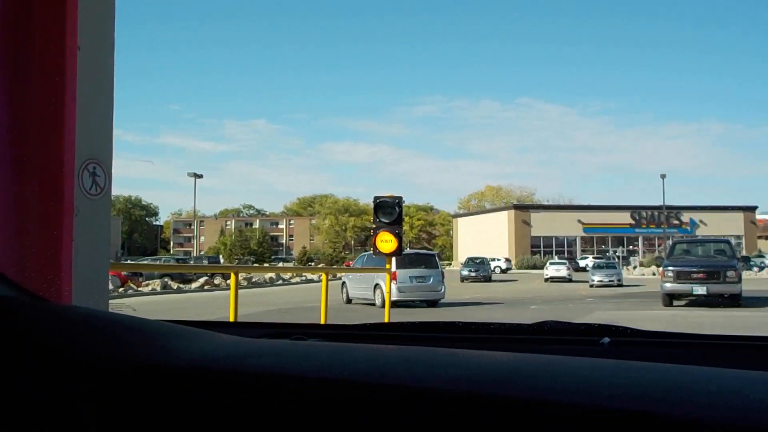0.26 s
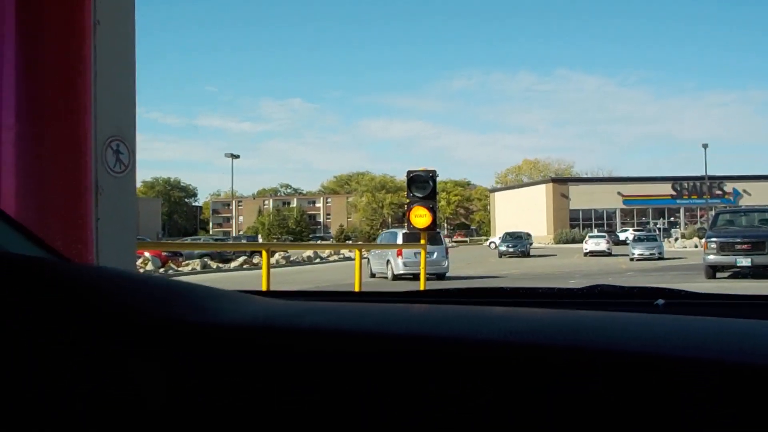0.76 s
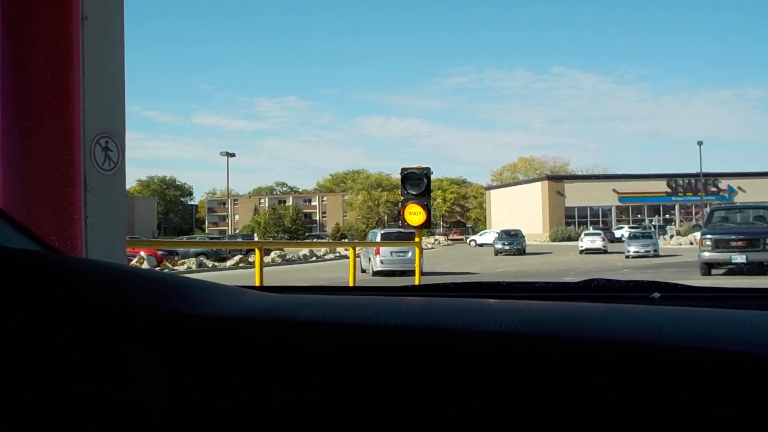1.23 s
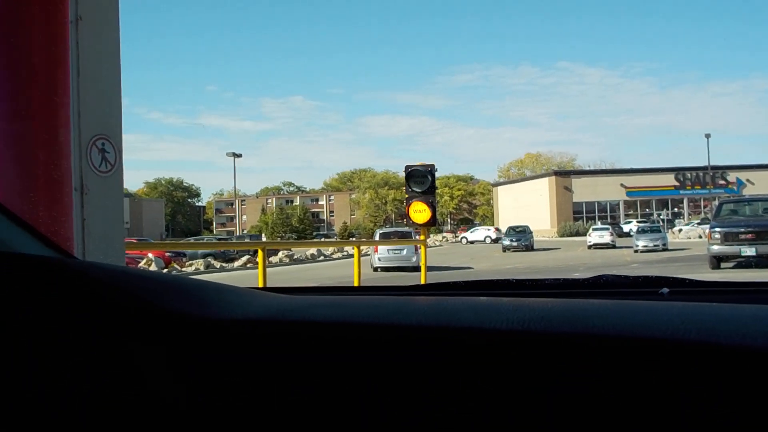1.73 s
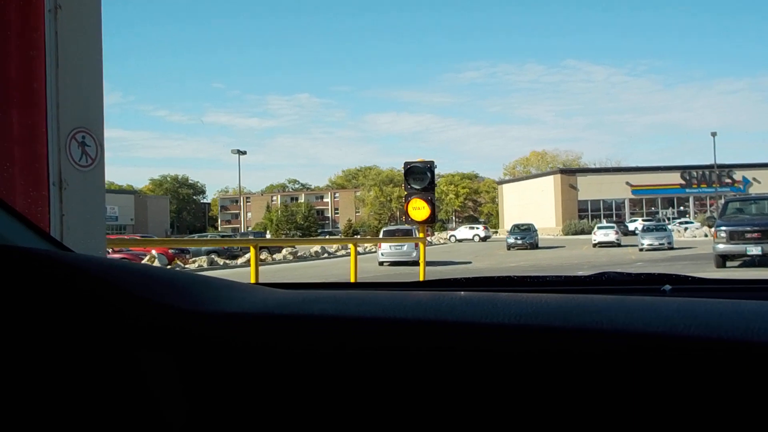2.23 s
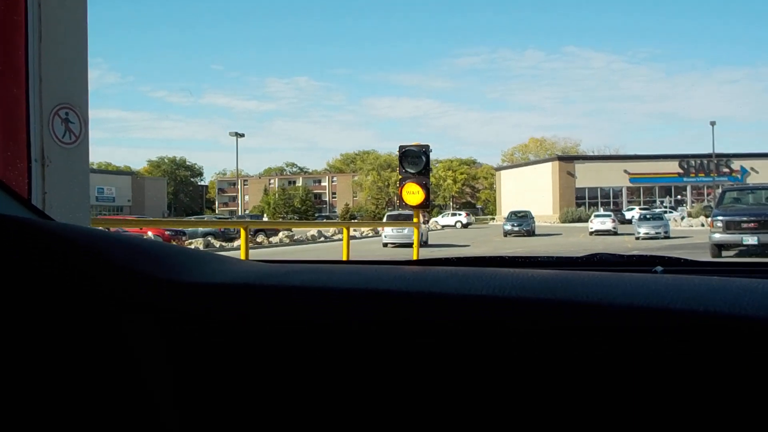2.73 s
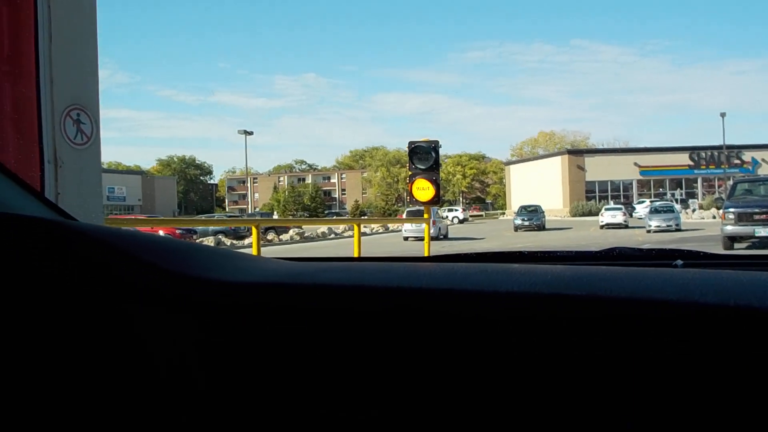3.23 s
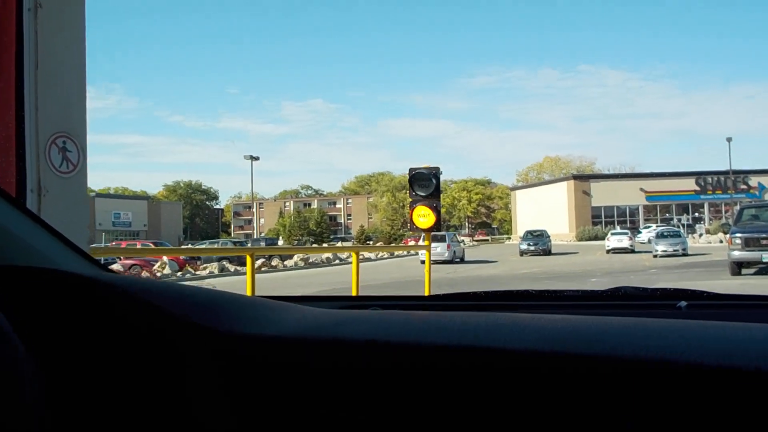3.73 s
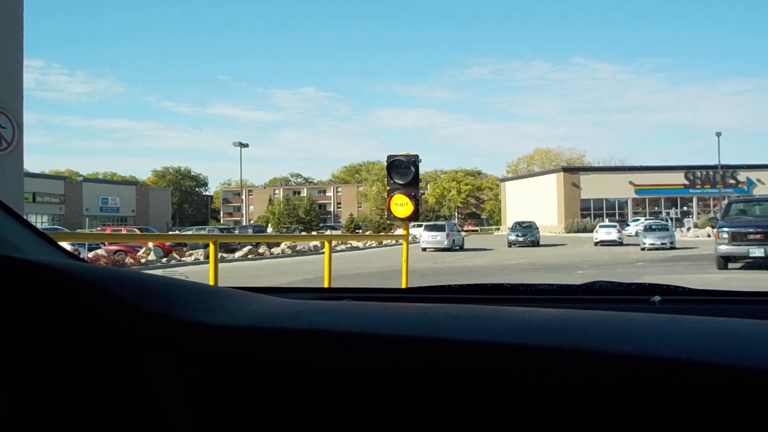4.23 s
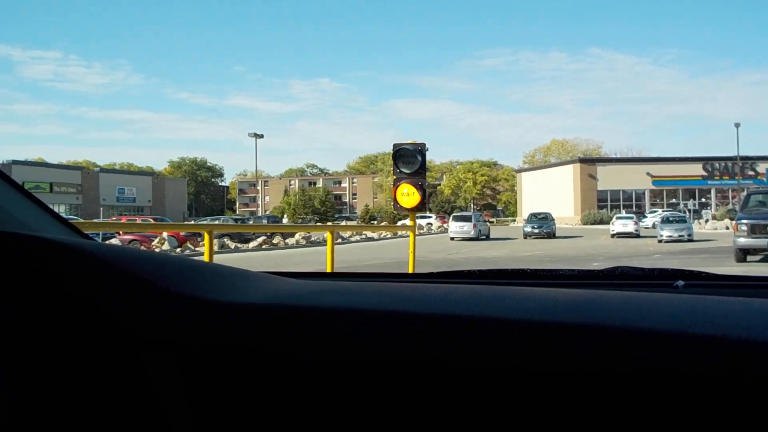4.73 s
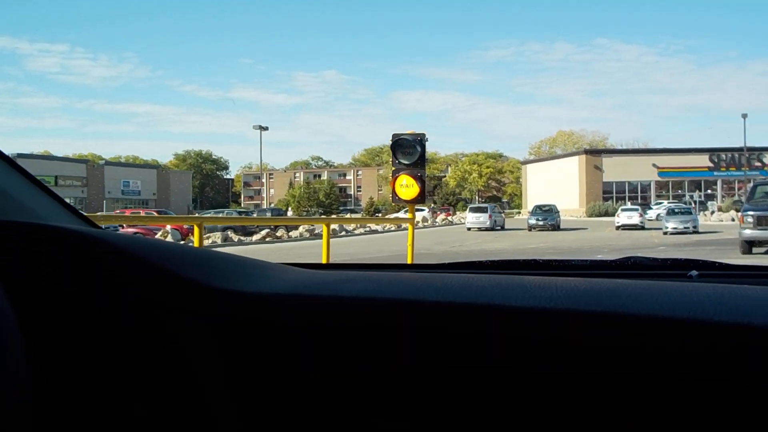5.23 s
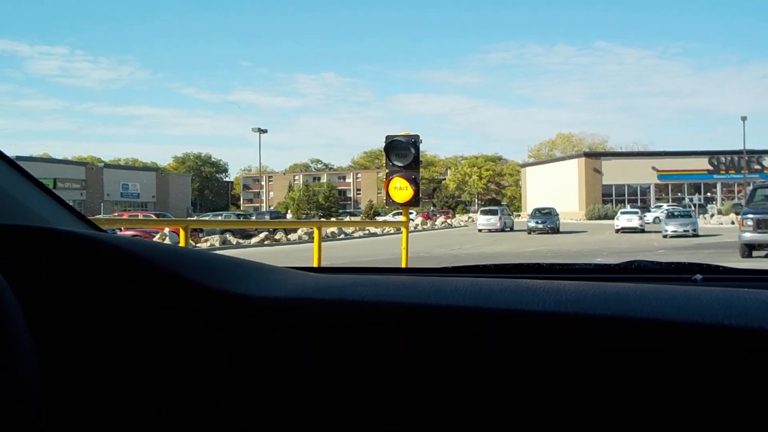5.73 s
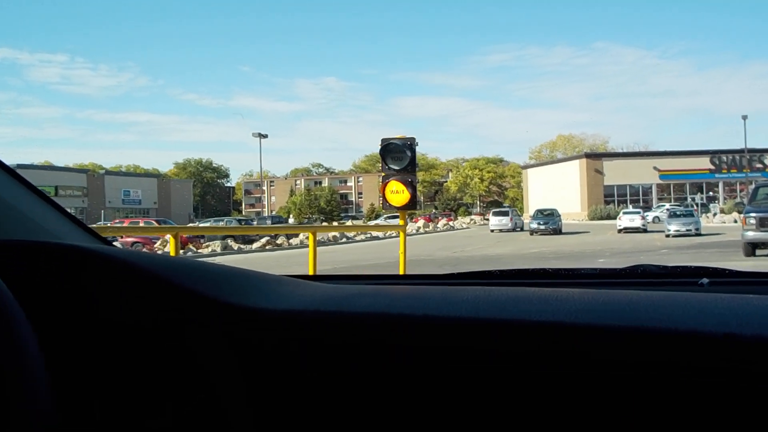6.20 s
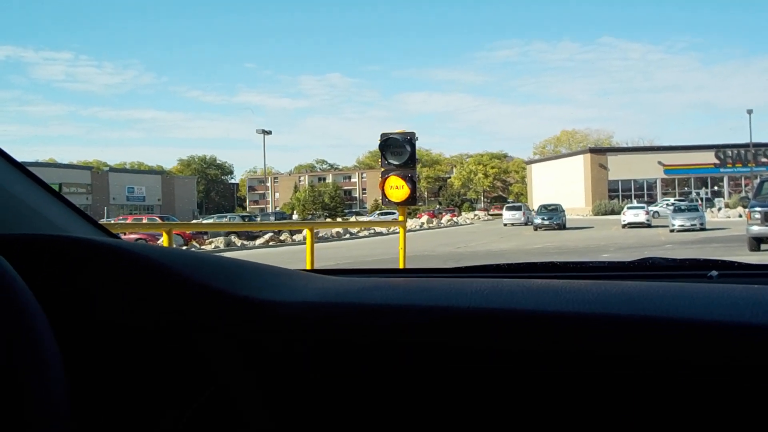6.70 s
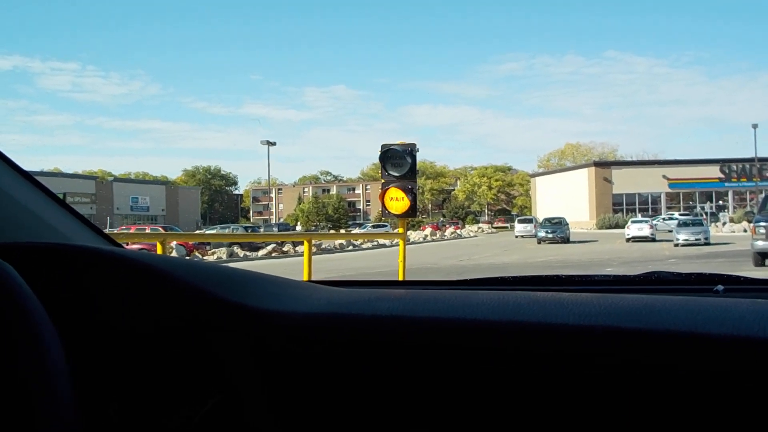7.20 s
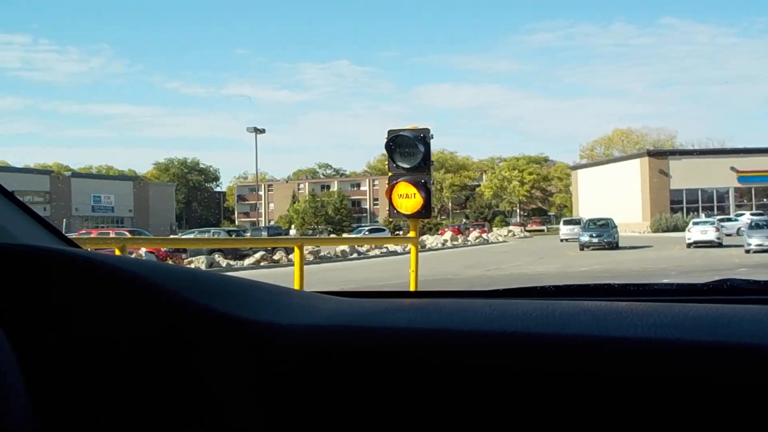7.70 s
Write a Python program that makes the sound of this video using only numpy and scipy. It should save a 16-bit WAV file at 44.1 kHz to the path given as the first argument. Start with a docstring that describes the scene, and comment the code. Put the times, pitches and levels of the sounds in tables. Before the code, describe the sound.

Heard in stereo from inside a car with its windows shut, rolling out of an automatic car wash. From 0 s, powerful dryer jets drum on the roof as thick, gusty, muffled noise, with a deep cabin boom and a rushing hiss above. Sharp plastic ticks cluster close to the microphone at 0.3-0.5 s, with another near 0.9 s; the strongest briefly duck the background. Around 2 s the drumming moves from roof to rear glass, the boom weakens, and gusts and quick air slaps continue, notably near 3 s. Between 3.5 and 4.3 s the jets slide off the tail, leaving a steadier tunnel roar, blower rush, seal hiss and a faint wavering whine. More dry ticks come at 5.5-5.65 s as the roar slowly fades. At 7.45 s a tiny scrape leads into a hard, hollow knock, followed by a last mild gust near 7.8 s.

```python
"""Car wash dryers, heard from inside a car rolling out of the tunnel with its windows shut.
The air jets drum on roof and glass as noise through panel resonances, and the cabin booms beneath.
Then they slide off the tail, leaving a fading tunnel roar, the blowers' rush and hiss, and a faint sine whine.
Sharp plastic ticks and one knock, made of short noise bursts and ringing sines, sound close to the microphone.
Its gain control ducks on strong bursts of treble."""
import sys
import numpy as np
from scipy import signal
from scipy.fft import rfft, irfft, next_fast_len
from scipy.io import wavfile
from scipy.ndimage import uniform_filter1d, minimum_filter1d, map_coordinates

SR = 44100
rng = np.random.default_rng(int(sys.argv[2]) if len(sys.argv) > 2 else 0)


def generate_wav(signal):
    """Clip the signal to [-1, 1] and save it as 16-bit WAV at the path in sys.argv[1]."""
    frames = np.transpose(np.atleast_2d(signal))
    scaled = np.clip(frames, -1, 1) * 32767
    pcm = np.round(scaled).astype(np.int16)
    wavfile.write(sys.argv[1], SR, pcm)


N = 350595

# the car's passage under the jets: (time [s], how squarely they hit [0-1], drumming level before gusts [dB])
JET_PASSAGE = [(0, 0.95, -26.5), (1.8, 0.91, -25.5), (2.15, 0.76, -27), (2.62, 0.95, -27.5),
               (2.85, 0.98, -28.3), (3.5, 0.76, -26.5), (3.88, 0.47, -29.5), (4.3, 0.03, -28),
               (7.95, 0, -18)]


def amp(db):
    """Decibels to gain."""
    return 10 ** (np.asarray(db) / 20)


def unit(x):
    """x at rms 1."""
    return x / np.sqrt(np.mean(x ** 2) + 1e-20)


def along(points, hz):
    """(frequency, value) points read on a log-frequency axis."""
    f, v = np.transpose(points)
    return np.interp(np.log(hz + 1), np.log(f + 1), v)


def curves(rows):
    """One value per sample for each column after the time."""
    times, *columns = np.transpose(rows)
    return [np.interp(np.arange(N) / SR, times, column) for column in columns]


def wobble(rate):
    """A smooth random curve with rate knots a second."""
    knots = rng.standard_normal(int(N * rate / SR) + 4)
    return map_coordinates(knots, [np.arange(N) * rate / SR])


def swells(rows, t):
    """Bell-shaped rises in dB from (time, rise, standard deviation) rows."""
    return sum(db * np.exp(-.5 * ((t - s) / length) ** 2) for s, db, length in rows)


def filtered(x, response):
    """x times a response of frequency."""
    n = x.shape[-1]
    padded = next_fast_len(n + n // 16)
    hz = np.fft.rfftfreq(padded, 1 / SR)
    return irfft(rfft(x, padded) * response(hz), padded)[..., :n]


def split(x, corner_hz):
    """The bass and the treble of x, which sum back to x."""
    bass = filtered(x, lambda hz: 1 / (1 + (hz / corner_hz) ** 6))
    return bass, x - bass


def band(low_hz, high_hz):
    """Gain per frequency of a steep band-pass."""
    return lambda hz: 1 / (1 + (low_hz / (hz + 1)) ** 8 + (hz / high_hz) ** 12)


def ports(left_db):
    """Gains of the left and right microphone ports, left_db apart, with a mean of 1."""
    pair = amp([[left_db / 2], [-left_db / 2]])
    return pair / pair.mean()


def airflow(spectrum, resonances, patchy_db):
    """Turbulent stereo noise of rms 1: patchy in time and pitch, coloured by a spectrum and its resonances."""
    # how alike the two channels are: (frequency [Hz], likeness [0-1])
    likeness = [(100, 0.94), (1600, 1), (2500, 0.9), (3300, 0.76), (5000, 0.69), (6200, 0.52), (7200, 0.13),
                (12000, 1)]
    grains = signal.stft(rng.standard_normal((2, N)), nperseg=512)[2]
    eddies = uniform_filter1d(rng.standard_normal(grains.shape[1:]), size=5, axis=0)
    eddies = uniform_filter1d(eddies, size=10, axis=1)
    pair = signal.istft(grains * amp(patchy_db * unit(eddies)), nperseg=512)[1][:, :N]

    def colour(hz):
        # each lift falls to half its dB at half a width from the centre
        lift = sum(db * .5 ** ((2 * (hz - centre) / width) ** 2) for centre, width, db in resonances)
        turn = np.arccos(np.clip(along(likeness, hz), 0, 1)) / 2
        return amp(along(spectrum, hz) + lift) * [np.cos(turn), np.sin(turn)]
    mid, side = filtered(pair, colour)
    return unit(np.array([mid + side, mid - side]))


def rolling_out(under_jet, behind):
    """Equal-power crossfade from one sound to the other as the car leaves the jets."""
    share = np.clip(curves(JET_PASSAGE)[0], 0, 1)
    return np.sqrt(share) * under_jet + np.sqrt(1 - share) * behind


def drumming():
    """The jets travel along the car, so the roof's resonances give way to those of the rear glass."""
    # spectrum of the drumming: (frequency [Hz], relative density [dB per Hz])
    spectrum = [(130, -46), (200, -19), (232, -12), (268, -6), (480, 1.5), (700, -0.5), (900, -7.5),
                (2000, -37), (2500, -83)]
    # panel resonances: (centre [Hz], width [Hz], lift [dB])
    roof = [(272, 36, 3), (352, 26, -4), (380, 22, 1), (438, 42, 6), (511, 34, 5.3), (548, 40, -7),
            (592, 24, 3), (660, 56, 3.8), (775, 50, -3)]
    rear_glass = [(280, 36, 2.5), (348, 26, -5.5), (380, 22, 2), (434, 42, 3.8), (510, 40, 3.5),
                  (548, 40, -6), (592, 24, 3), (665, 50, 3.8), (840, 36, 2), (910, 36, 2.5)]
    rear_s, crossing_s = 2.05, 0.73  # midpoint and length of the crossing
    rear = np.clip(.5 + (np.arange(N) / SR - rear_s) / crossing_s, 0, 1)
    on_roof = np.sqrt(1 - rear) * airflow(spectrum, roof, patchy_db=-0.63)
    on_glass = np.sqrt(rear) * airflow(spectrum, rear_glass, patchy_db=1.4)
    return on_roof + on_glass


def flexing(x, bend=0.008005, rate=5):
    """The panels flex under the jets, so their resonances drift a little up and down."""
    place = np.arange(N) + np.cumsum(bend * wobble(rate))
    return np.array([map_coordinates(side, [place], mode="mirror") for side in x])


def battered_panels(t, flutter_db=0.22, flutter_rate=28):
    """Drumming on flexing panels, with slaps of air that lift only the upper part of its sound."""
    # slaps of air on the roof: (time [s], rise [dB], standard deviation [s])
    slaps = [(.647, 6, .004), (.765, 2, .015), (1.334, 5, .018), (2.991, 7, .005), (3.046, 4, .005),
             (3.972, 6, .004)]
    level_db = curves(JET_PASSAGE)[1] + flutter_db * wobble(flutter_rate)
    low, clatter = split(flexing(drumming()), corner_hz=300)
    return amp(level_db) * (low + amp(swells(slaps, t)) * clatter)


def tunnel(t, level_db=-33, fade_from_s=5.75, fade_db_per_s=0.8):
    """The tunnel's roar heard through the cabin's resonances, fading with distance."""
    # spectrum of the roar: (frequency [Hz], relative density [dB per Hz])
    spectrum = [(25, -48), (50, -32.5), (95, -39), (122, -15.5), (165, -20), (200, -26.5), (232, -19),
                (268, -6), (350, -0.5), (520, -1), (700, -2.5), (900, -7.5), (2000, -22.5), (2500, -87)]
    # cabin resonances: (centre [Hz], width [Hz], lift [dB])
    resonances = [(335, 30, 2), (445, 46, 4.6), (449, 14, 5), (550, 50, -4), (590, 28, 2), (690, 30, 2)]
    faded_db = level_db - fade_db_per_s * np.maximum(t - fade_from_s, 0)
    return amp(faded_db) * airflow(spectrum, resonances, patchy_db=0.27)


def roar():
    """Gusty jets batter the panels; once past them, only the tunnel's roar reaches the cabin."""
    # gusts, each a smooth swell of the roar: (time [s], rise [dB], standard deviation [s])
    gusts = [(.54, 2, 0.032), (.74, 1.5, 0.034), (.98, 2, 0.1), (1.35, 2.5, 0.048), (1.58, 2.3, .06),
             (1.88, 3.5, 0.079), (2.45, 3, 0.029), (3.02, 1, 0.029), (3.17, 0, 0.021), (3.33, 1.5, 0.035),
             (4.53, 2, 0.033), (7.78, 2.5, .07)]
    t = np.arange(N) / SR
    return amp(swells(gusts, t)) * rolling_out(battered_panels(t), tunnel(t))


def boom():
    """The jets pump the air in the cabin, which booms at two low resonances and dies away behind them."""
    # (time [s], level [dB])
    level = [(0, -42.5), (1, -42), (1.55, -43), (2.2, -42), (2.6, -49), (3.15, -48), (3.55, -47),
             (3.95, -52), (4.6, -64), (7.95, -88)]
    # (frequency [Hz], relative density [dB per Hz])
    spectrum = [(25, -56), (50, -27), (95, -36), (116, -9), (145, -3), (180, -4.5), (205, -11.5),
                (260, -60.5)]
    # resonances of the cabin air: (centre [Hz], width [Hz], lift [dB])
    cabin_air = [(126, 14.5, 8.5), (166.4, 39, 6.5)]
    return amp(curves(level)[0]) * airflow(spectrum, cabin_air, patchy_db=0.8)


def nozzle_rush():
    """Nozzle turbulence of rms 1 through the resonant side glass."""
    # (frequency [Hz], relative density [dB per Hz])
    spectrum = [(300, -31.5), (650, -12.5), (950, 2), (1450, -0.5), (1650, -4), (1950, -8.5), (2150, -14.5),
                (2350, -31.5), (2700, -51), (4000, -91)]
    # (centre [Hz], width [Hz], lift [dB])
    side_glass = [(1200, 50, 3), (1320, 120, -2), (1440, 70, 2.5)]
    return airflow(spectrum, side_glass, patchy_db=0.0)


def seal_hiss():
    """Air hisses through the door seals, whose resonances change as the jets fall behind."""
    # (frequency [Hz], relative density [dB per Hz])
    spectrum = [(1800, -40), (2450, -15.5), (2750, 1.5), (3030, -11), (3400, 0.5), (4100, 0), (4700, -4.5),
                (5400, 6), (6000, 1), (6900, 1.5), (7500, -15), (7900, -71), (9000, -56.5)]
    # seal resonances: (centre [Hz], width [Hz], lift [dB])
    under_jet = [(3690, 150, 3), (4190, 160, 3.4), (5190, 150, 3.7)]
    behind = [(3720, 190, 1.5), (5170, 140, 3.8), (6130, 220, 6.6)]
    return rolling_out(airflow(spectrum, under_jet, patchy_db=0.46), airflow(spectrum, behind, patchy_db=0.34))


def fan_whine(pitch_hz=1945, level_db=-62, waver_hz=2.5):
    """A faint sine that wavers in pitch and strength."""
    phase = 2 * np.pi * np.cumsum(pitch_hz + waver_hz * wobble(5.6)) / SR
    return amp(level_db) * unit(np.sin(phase) * amp(2.5 * wobble(3.8)))


def blowers(hiss_trim_db=0.79):
    """Nozzle rush through the glass, hiss through the door seals, and the fan whine."""
    # (time [s], rush level [dB], hiss level before its trim [dB])
    levels = [(0, -36, -47), (1, -37, -46.5), (2, -36.5, -46.5), (3.7, -36.5, -45.5), (4.4, -38.5, -46),
              (5.9, -37.5, -47), (7.3, -40, -46.5), (7.95, -39, -47)]
    rush_db, hiss_db = curves(levels)
    return amp(rush_db) * nozzle_rush() + amp(hiss_db + hiss_trim_db) * seal_hiss() + fan_whine()


def microphone_hiss(level_db=-69.0, shared=1.0):
    """Faint, even self-noise, partly common to both channels."""
    # (frequency [Hz], relative gain [dB])
    spectrum = [(4000, -22), (8000, -44), (9500, 10), (12500, 16.5), (15000, 13.5), (16000, 12)]
    noise = rng.standard_normal((2, N)) + shared * rng.standard_normal(N)
    return amp(level_db) * unit(filtered(noise, lambda hz: amp(along(spectrum, hz))))


def burst(t, colour, t60=.0025, span_s=.0016):
    """A tiny random crunch around t = 0, its spectrum shaped by the given gain per frequency."""
    fade = (t >= 0) * amp(-60 * np.abs(t) / t60)
    phase = np.angle(rfft(fade * rng.standard_normal(len(t))))
    crunch = irfft(np.exp(1j * phase) * colour(np.fft.rfftfreq(len(t), 1 / SR)))
    crunch = crunch * np.exp(-.5 * (t / span_s) ** 2)
    return unit(crunch) * np.sqrt(np.mean(fade ** 2)) / 2  # the fade sets its energy


def snap(t, apart=.5):
    """A bright, dry crack, partly different at each port."""
    # (frequency [Hz], relative gain [dB])
    spectrum = [(200, -50), (1000, -20), (2500, -3), (6000, 13), (7200, 12), (8100, -12), (9600, 7),
                (12500, 9), (15500, 5), (16200, -9)]
    bright = lambda hz: amp(along(spectrum, hz))
    common = burst(t, bright)
    opposed = apart * burst(t, bright) * [[1], [-1]]
    return (common + opposed) / np.hypot(1, apart)


def tick_ring(t, ring_db, scatter_db=1.8, lead_s=.0008, rise_s=.0017, left_db=-19):
    """The plastic rings at two pitches in a short swell, mostly at the right port."""
    # (frequency [Hz], level relative to the ring [dB])
    modes = [(2130, 0), (2750, -5.5)]
    age = np.maximum(t + lead_s, 0)
    swell = (age / rise_s * np.exp(1 - age / rise_s)) ** 2
    tone = 0
    for k, (hz, level_db) in enumerate(modes):
        gain = amp(ring_db + level_db + scatter_db * rng.standard_normal())
        tone = tone + (-1) ** k * gain * np.sin(2 * np.pi * hz * age)
    return swell * tone * amp([[left_db], [0]])


def ticks():
    """Each tick is a brief dry snap over a narrower body, with a short two-note plastic ring."""
    # (time [s], crack level [dB], body low edge [Hz], body high edge [Hz], body relative to the snap [dB],
    #  crack's left minus right before the ports' tilt [dB], ring level before scatter [dB])
    events = [(.321, -14, 1500, 3600, -5, -24, -23.5), (.3315, -44, 2000, 3000, -6, -10, -25),
              (.3948, -18, 4300, 5500, 3.5, -22, -26), (.405, -52, 2000, 3000, -6, -10, -29),
              (.4148, -18.5, 4400, 5600, 5, -16, -24), (.4265, -54, 2000, 3000, -6, -10, -31.5),
              (.462, -22.5, 3300, 6000, -9, -22, -29), (.8905, -29, 4300, 5500, 7, -18, -30.5),
              (5.4982, -35, 2000, 3000, -8, -11, -31), (5.544, -23.5, 3200, 4500, -7, -24, -30),
              (5.5634, -21.5, 4000, 6200, -4, -22, -29.5), (5.6204, -25.5, 11800, 13200, -6, -22, -29.5),
              (5.6405, -58, 2000, 3000, -6, -10, -36)]
    out, t = np.zeros((2, N)), np.arange(-256, 1280) / SR
    for s, db, low_hz, high_hz, body_db, left_db, ring_db in events:
        body = amp(body_db) * burst(t, band(low_hz, high_hz))
        crack = amp(db) * (snap(t) + body) * ports(left_db)
        start = round((s + t[0]) * SR)
        out[:, start:][:, :len(t)] += crack + tick_ring(t, ring_db)
    return out


def knock(at_s=7.4511, snap_db=-22, scrape_lead_s=.0007):
    """A scrape leads into one hard, duller blow that rings a few short, hollow modes under a thin snap."""
    # scrape: (low edge [Hz], high edge [Hz], level [dB], left minus right before the ports' tilt [dB])
    scrape_settings = (3300, 4500, -20, -8)
    # (frequency [Hz], level before the body's band [dB], t60 [s], left minus right before the ports' tilt [dB])
    modes = [(1150, -12, .0045, -7), (1900, -18, .006, -6), (2850, -28, .012, 4), (3400, -30, .009, 0),
             (4500, -22, .008, 2)]
    # bands of the hollow body and the thin snap: (low edge [Hz], high edge [Hz])
    body_band = (750, 4900)
    snap_band = (8500, 15500)
    out, t = np.zeros((2, N)), np.arange(-256, 1280) / SR
    low_hz, high_hz, scrape_db, left_db = scrape_settings
    scrape = amp(scrape_db) * burst(t + scrape_lead_s, band(low_hz, high_hz)) * ports(left_db)
    age = np.maximum(t, 0)
    body = sum(amp(db - 60 * age / t60) * np.sin(2 * np.pi * hz * age) * ports(pan_db)
               for hz, db, t60, pan_db in modes)
    thin_snap = amp(snap_db) * burst(t, band(*snap_band))
    start = round((at_s + t[0]) * SR)
    out[:, start:][:, :len(t)] = scrape + filtered(body, band(*body_band)) + thin_snap
    return out


def scene():
    """Everything reaches the two microphone ports, louder on the right at most pitches."""
    # (frequency [Hz], left minus right [dB])
    tilt = [(60, 5), (160, -2), (400, -3), (1900, -4.5), (2900, -1.5), (4200, -1.5), (5200, -6), (6200, -3),
            (12000, -0.5)]
    # (frequency [Hz], phase by which left leads [rad])
    lead = [(40, 0), (110, -0.68), (260, -0.19), (500, -0.019), (2000, -0.033), (4800, -0.27), (6100, 0.35),
            (9000, 0)]
    cabin = roar() + boom() + blowers() + microphone_hiss() + ticks() + knock()
    sides = np.array([[.5], [-.5]])
    return filtered(cabin, lambda hz: amp(sides * along(tilt, hz)) * np.exp(1j * sides * along(lead, hz)))


def gain_control(x, threshold_db=-32, slope=.85, deepest_db=11, hold_s=.009, release_db_per_s=230,
                 attack_s=.0015, bass_share=.38, corner_hz=1200):
    """Strong treble pulls the gain down; it holds briefly, then recovers evenly. The bass ducks less."""
    # sample-to-sample steps stress the treble; the louder port decides
    edge_power = np.abs(uniform_filter1d(np.diff(x, prepend=0) ** 2, size=44)).max(axis=0)
    excess_db = 10 * np.log10(edge_power + 1e-12) - threshold_db
    wanted_db = np.clip(slope * excess_db, 0, deepest_db)
    half = round(hold_s * SR / 2)
    held_db = -minimum_filter1d(-wanted_db, 2 * half + 1, origin=half)
    recovered = release_db_per_s * np.arange(N) / SR
    cut_db = np.maximum.accumulate(held_db + recovered) - recovered
    lag = np.exp(-1 / (attack_s * SR))
    duck_db = signal.lfilter([1 - lag], [1, -lag], cut_db)
    bass, treble = split(x, corner_hz)
    return bass * amp(-bass_share * duck_db) + treble * amp(-duck_db)


def record(dry, top_hz=16100):
    """The microphone's gain control, then a sharp upper band limit."""
    return filtered(gain_control(dry), lambda hz: hz < top_hz)


dry = scene()
out = record(dry)
generate_wav(out)
```